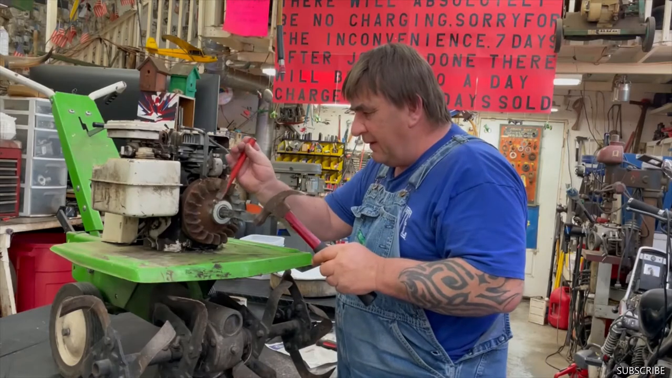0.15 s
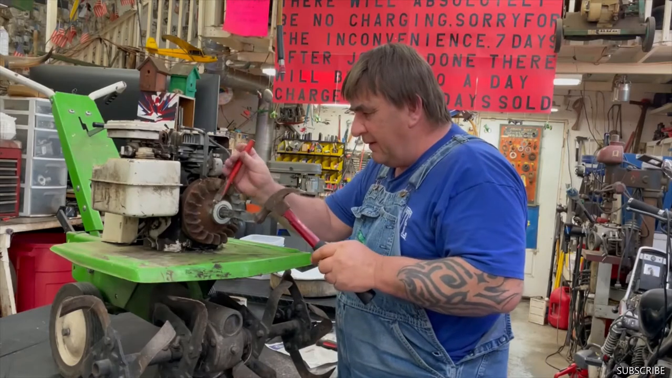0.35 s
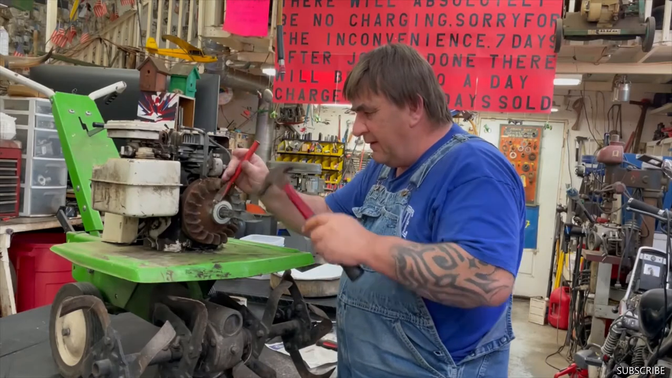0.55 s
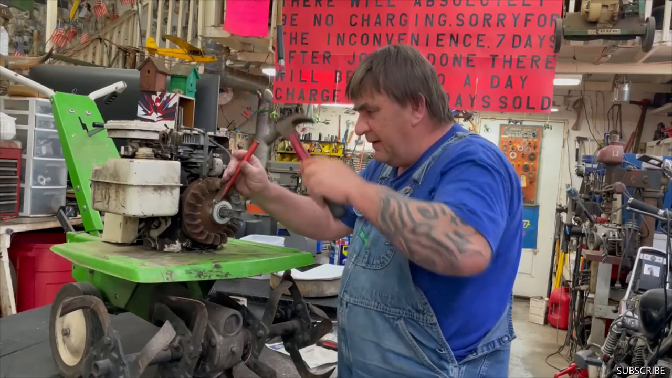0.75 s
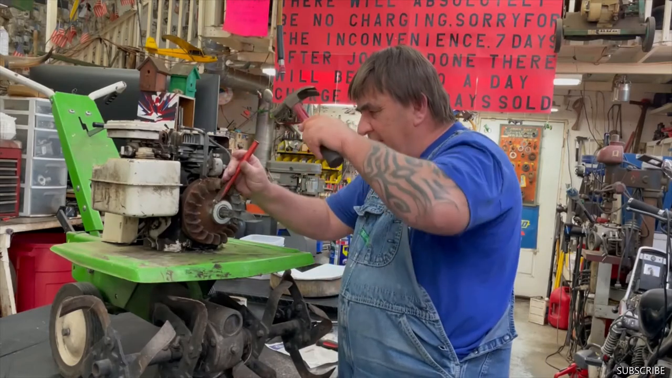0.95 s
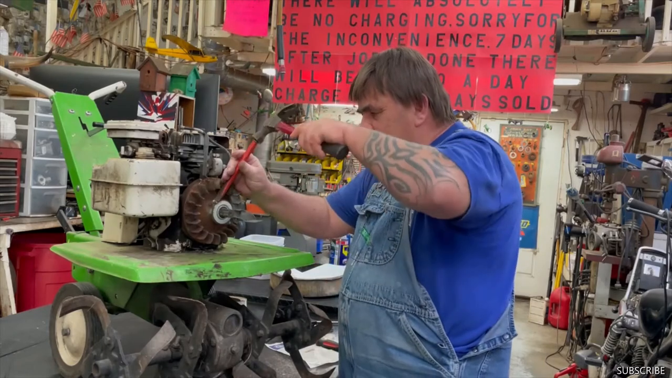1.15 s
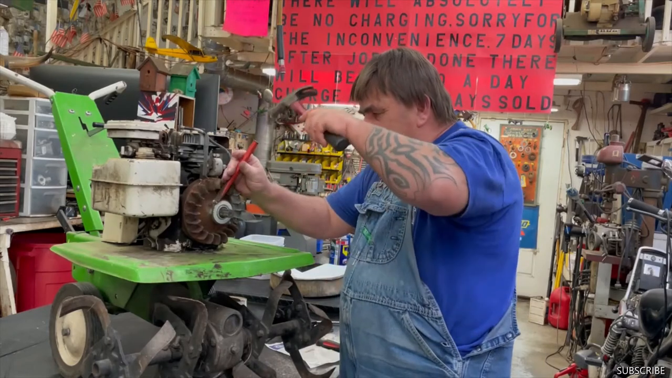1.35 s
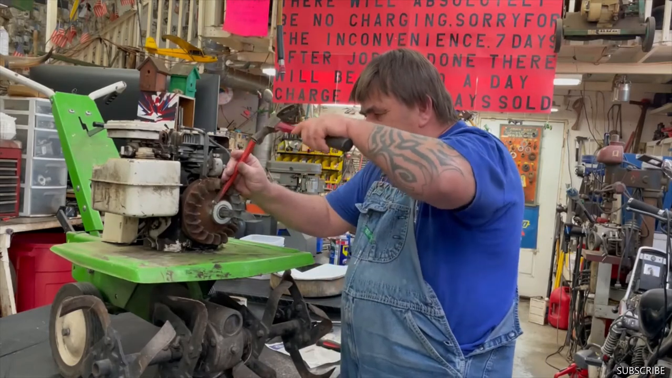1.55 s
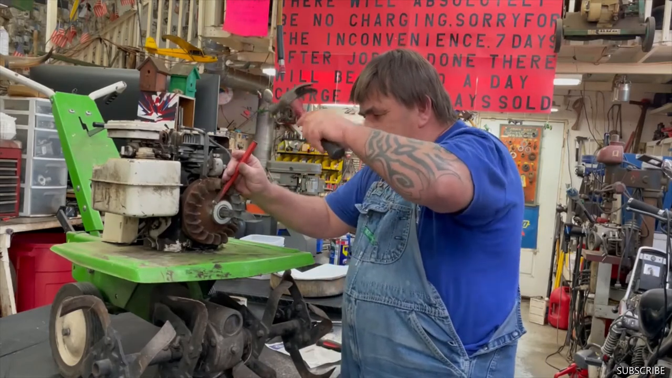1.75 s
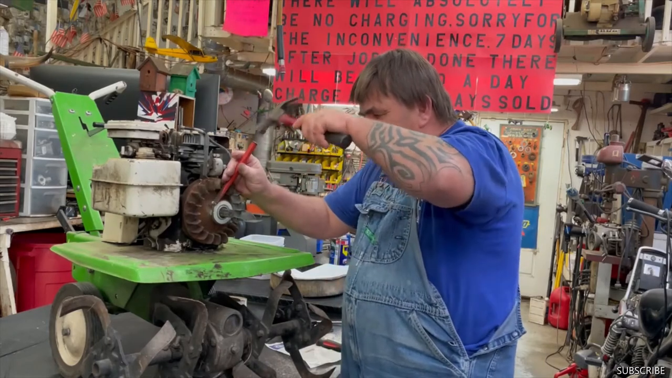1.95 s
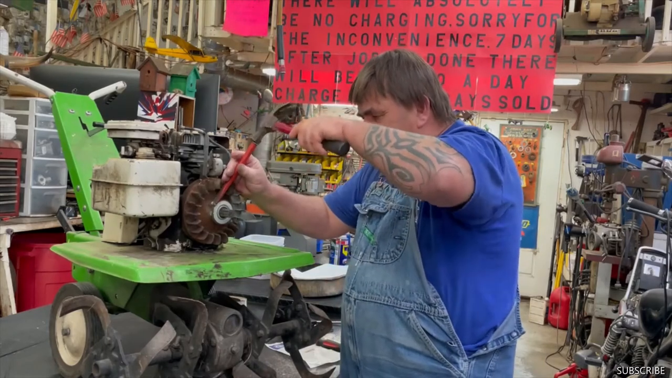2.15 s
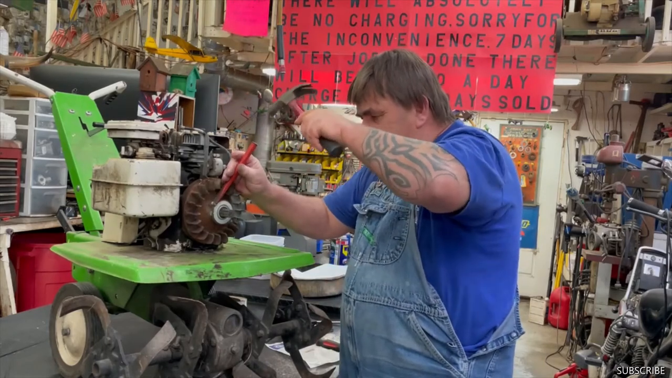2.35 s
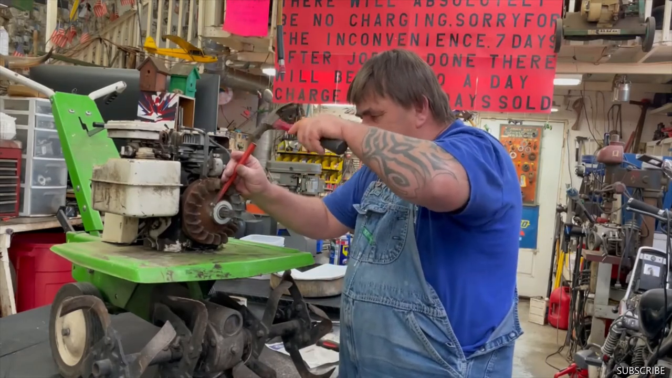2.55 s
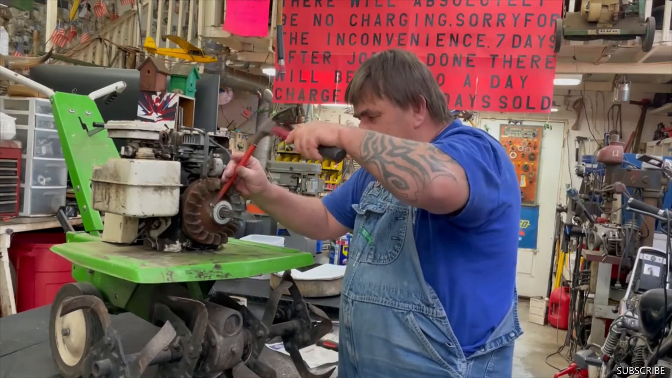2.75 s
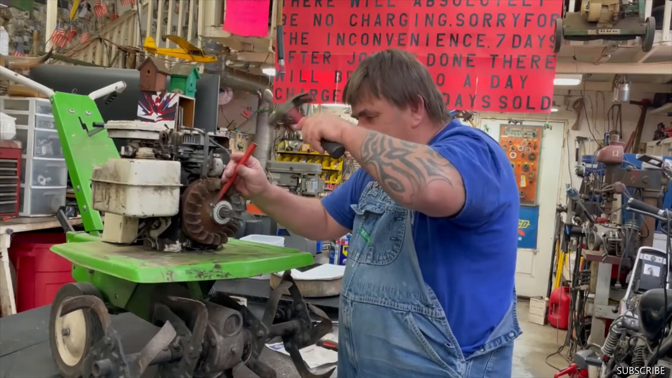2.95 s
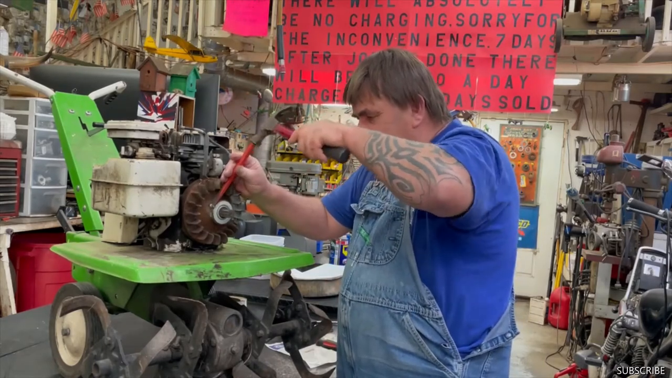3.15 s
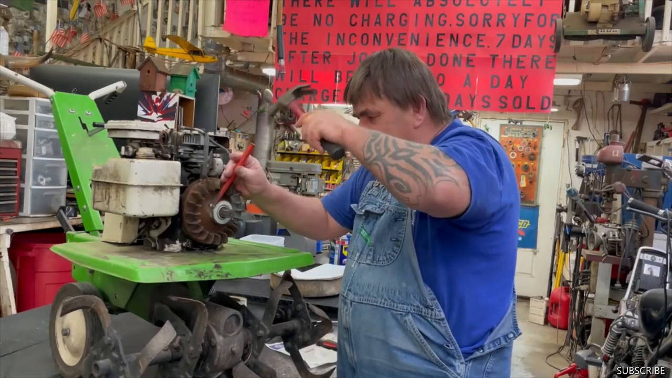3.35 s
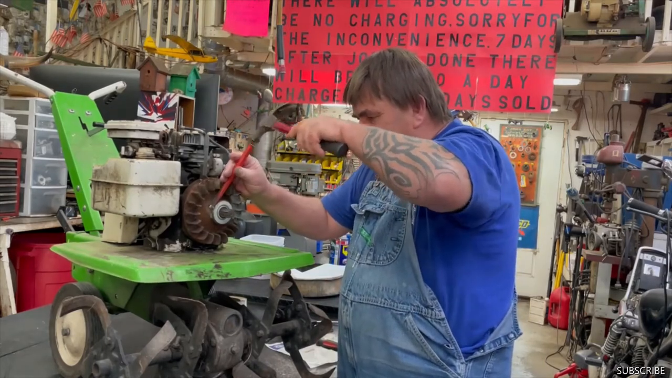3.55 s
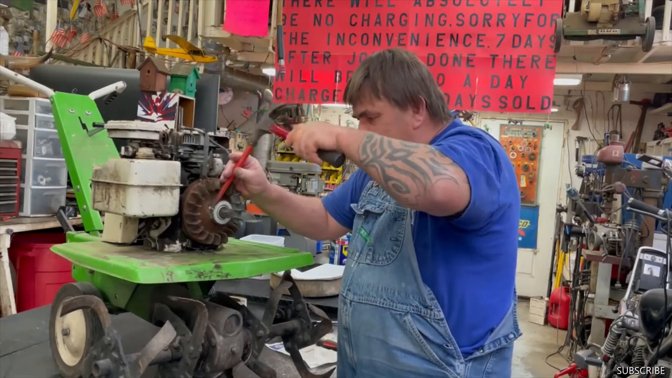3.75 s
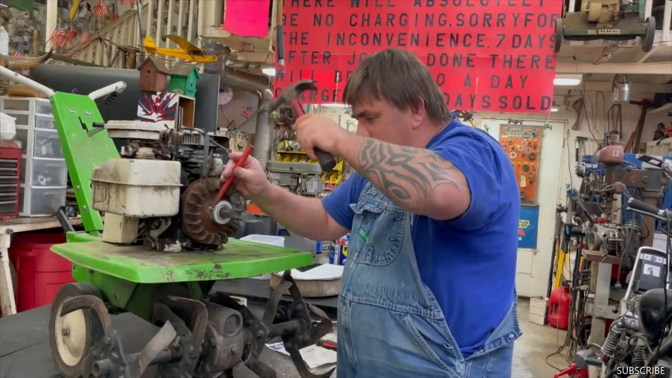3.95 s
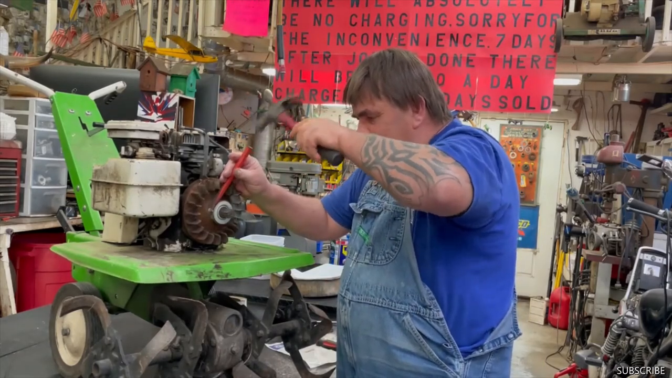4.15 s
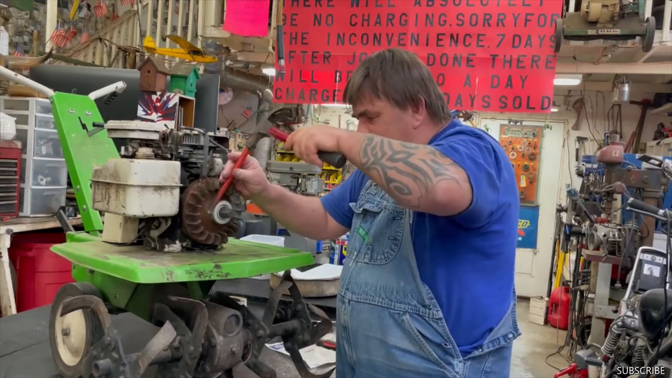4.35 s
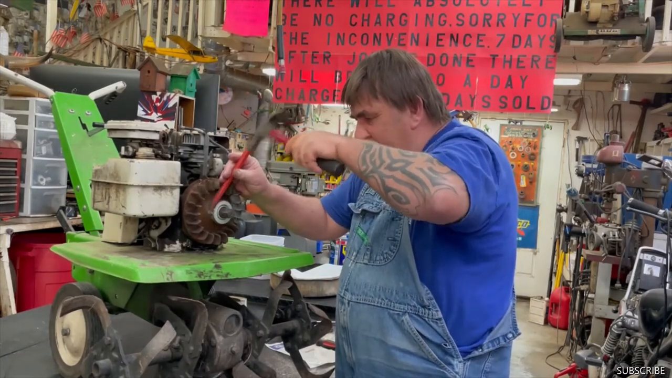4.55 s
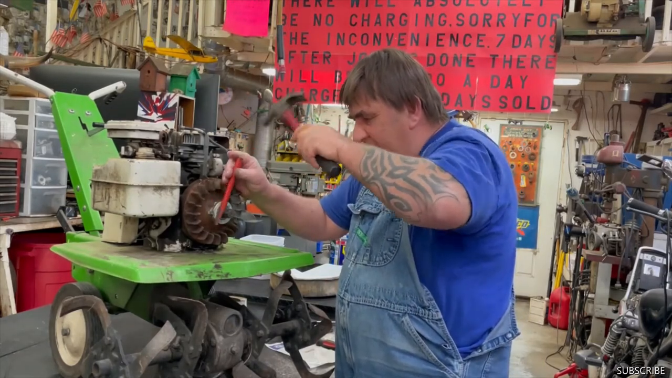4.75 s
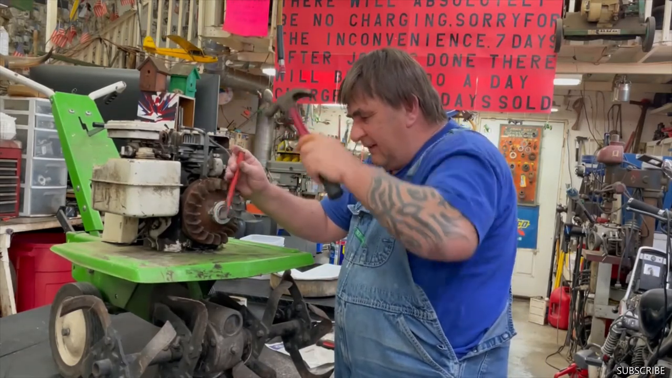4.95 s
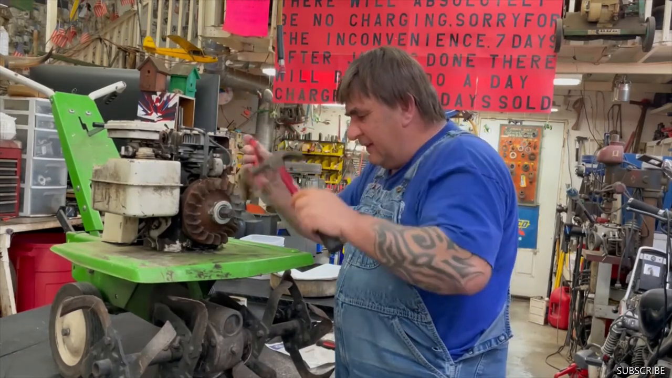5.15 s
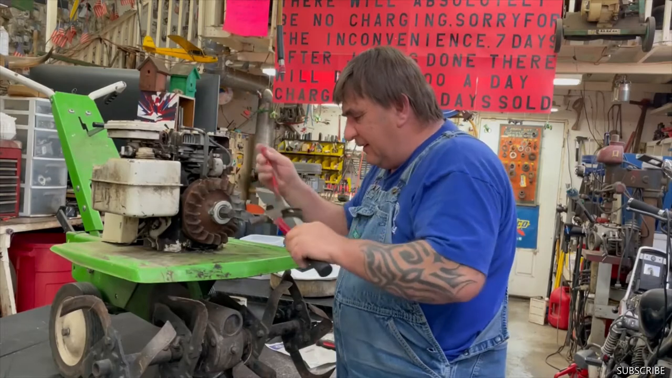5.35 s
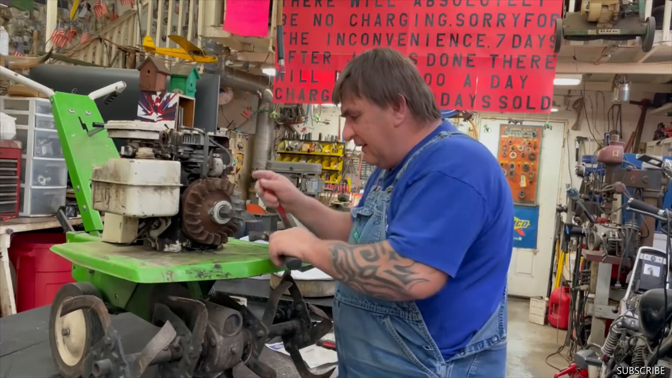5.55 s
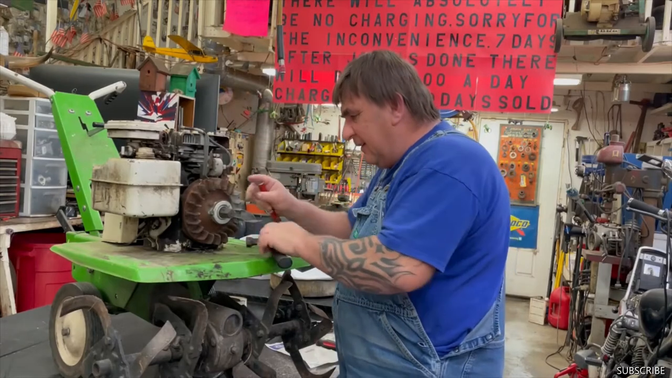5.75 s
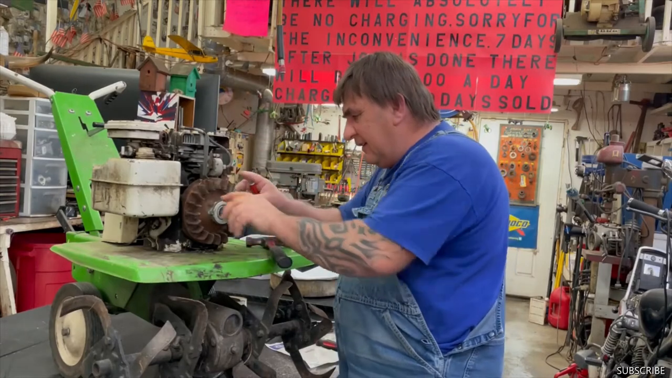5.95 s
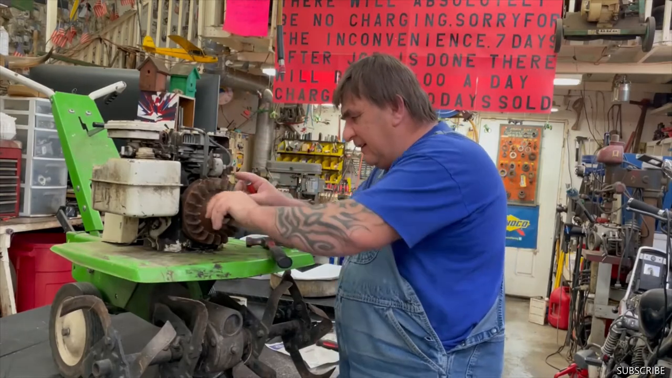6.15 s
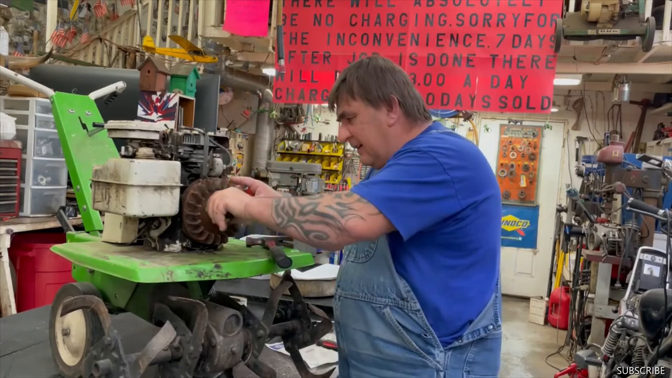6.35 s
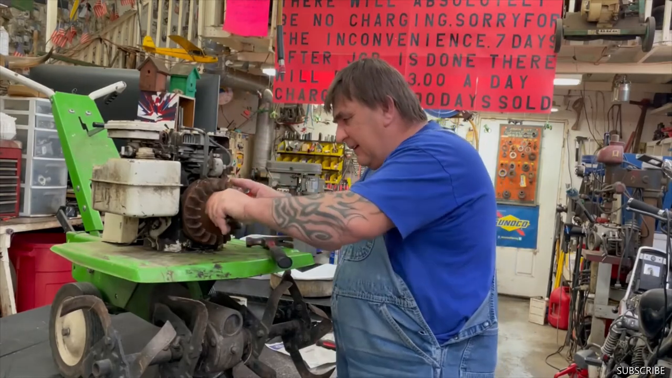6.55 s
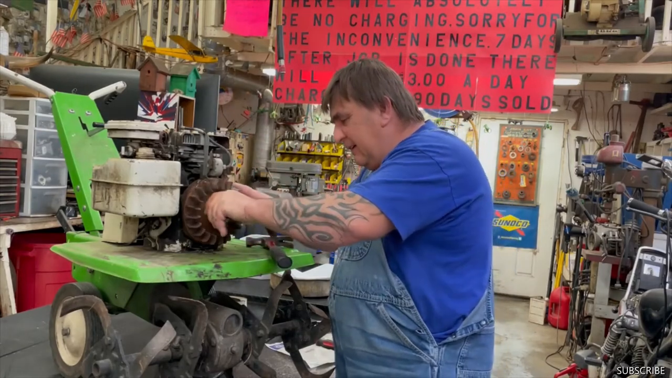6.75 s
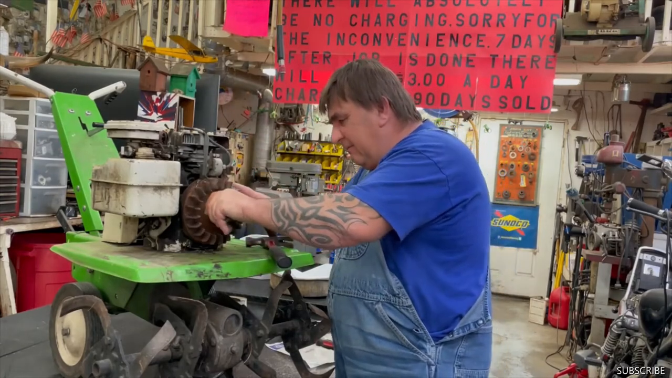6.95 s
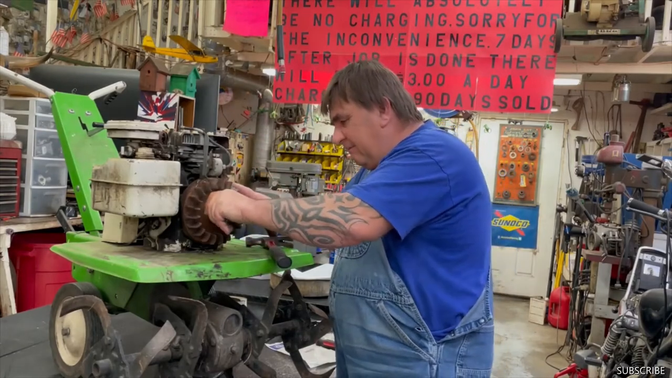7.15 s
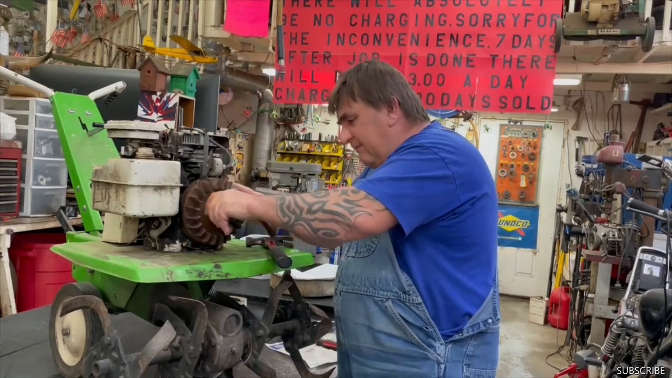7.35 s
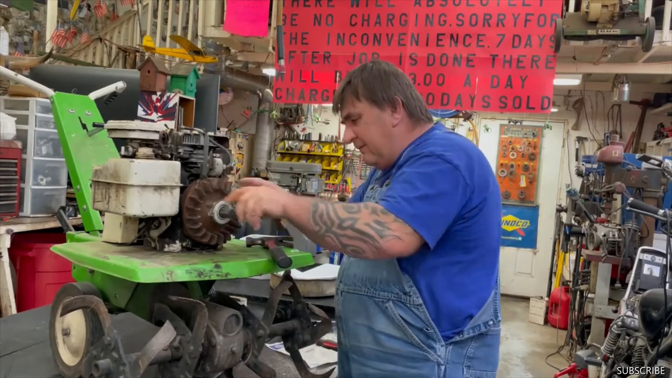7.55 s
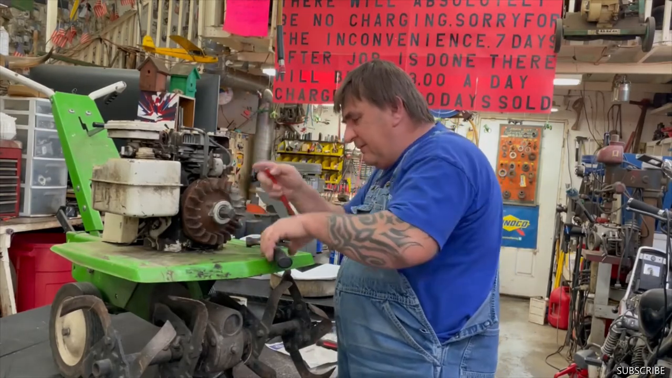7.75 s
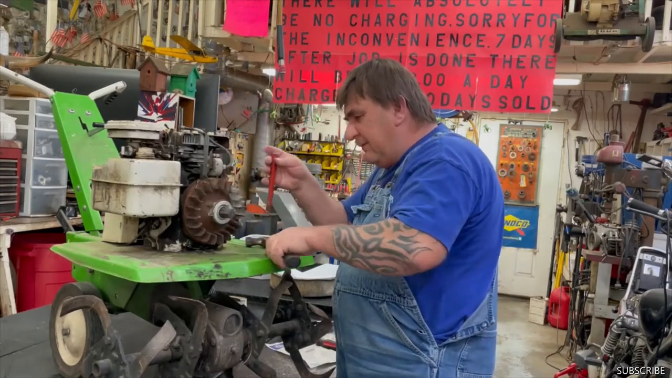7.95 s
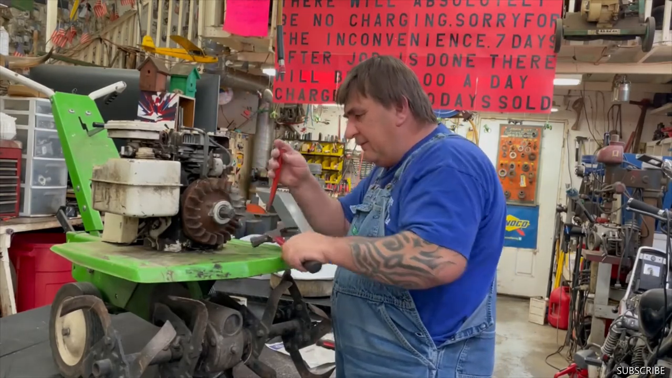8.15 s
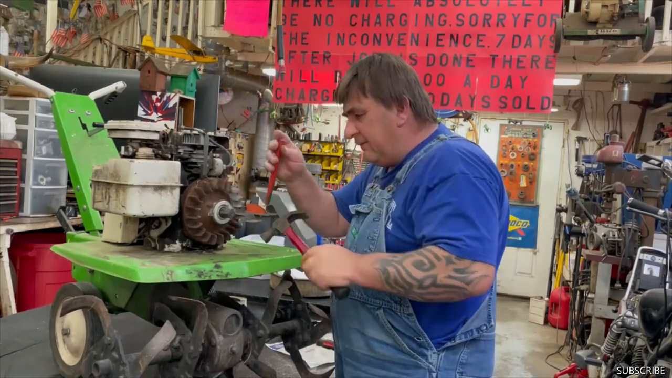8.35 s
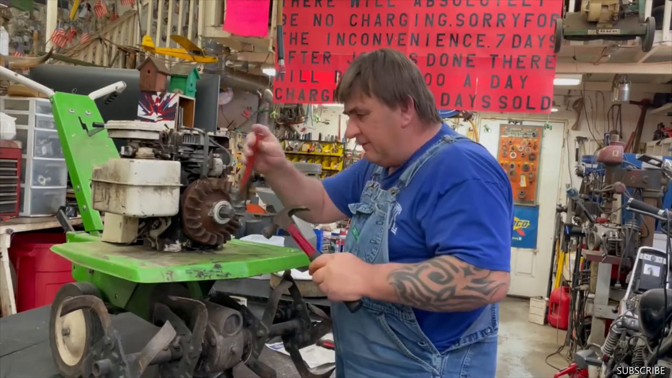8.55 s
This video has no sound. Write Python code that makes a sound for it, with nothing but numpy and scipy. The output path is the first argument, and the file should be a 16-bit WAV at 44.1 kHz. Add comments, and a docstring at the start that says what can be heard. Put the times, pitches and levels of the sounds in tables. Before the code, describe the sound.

A hammer cracks on a chisel a dozen times at a small engine, ringing steel and booming table, then tools clatter down in a cluttered workshop.

```python
"""A hammer drives a chisel against a small engine on a steel table, two metres from a phone in a cluttered workshop.
Each blow is a crack of shaped noise, steel ringing in decaying sines and a late boom of the table in band noise.
Tools later bounce on the table as bursts with ringing modes, small steel clinks come before and after the blows,
and a sleeve rustles in strokes of noise; the hum of a fan and microphone hiss, both filtered noise, lie under it.
Echoes from the clutter surround the bench, which stands left of the phone's two microphone ports."""
import sys
import numpy as np
from scipy import signal
from scipy.fft import rfft, irfft, next_fast_len
from scipy.io import wavfile
from scipy.ndimage import uniform_filter1d

SR = 44100
rng = np.random.default_rng(int(sys.argv[2]) if len(sys.argv) > 2 else 0)


def digitize_waveform(pressure):
    """Quantize a signal to 16-bit integers and store it at the path in sys.argv[1].

    Rows of a 2-D input are taken as channels; values are limited to [-1, 1].
    """
    field = np.atleast_2d(pressure).T
    bounded = np.clip(field, -1, 1)
    quanta = np.round(bounded * 32767).astype(np.int16)
    wavfile.write(sys.argv[1], SR, quanta)


N = 379260
T = np.arange(SR) / SR  # one second after a hit


def undb(db):
    """Turns decibels into an amplitude factor."""
    return 10 ** (np.asarray(db) / 20)


def on(table, hz, column=1):
    """Reads a table along log frequency."""
    t = np.array(table, float)
    return np.interp(np.log(hz + 1e-9), np.log(t[:, 0]), t[:, column])


def shape(x, gain):
    """Filters by a gain given as a function of frequency."""
    n = next_fast_len(x.shape[-1])
    hz = np.arange(n // 2 + 1) * SR / n
    return irfft(rfft(x, n) * gain(hz), n)[..., :x.shape[-1]]


def level(x, db):
    """Sets the rms level in dB."""
    return x * undb(db) / np.sqrt(np.mean(x ** 2))


def peak(hz, centre_hz, width_hz):
    """Gain of a resonance around its centre."""
    return 1 / np.sqrt(1 + (2 * (hz - centre_hz) / width_hz) ** 2)


def walk(rate):
    """Random levels held 1 / rate s and slewed twice; spread near 1."""
    k = int(SR / rate)
    steps = np.repeat(rng.standard_normal(N // k + 1), k)
    return 1.6 * uniform_filter1d(uniform_filter1d(steps, k), k)[:N]


def add(track, s, x):
    """Lays a one-second sound into the track at s seconds."""
    i = int(s * SR)
    track[i:i + SR] += x[:N - i]


def spread(a, b):
    """Two unrelated sounds made into a left and right that are alike by band."""
    # likeness of the sound sent to the two ports: hz, likeness (0-1)
    alike = [(40, .85), (90, .95), (200, 1), (400, 0.65), (1200, 0.1), (3000, 0.9), (5500, 0), (8000, 0.22),
             (13000, 0.99)]
    likeness = lambda f: np.clip(on(alike, f), 0, 1)
    mid = shape(a, lambda f: np.sqrt((1 + likeness(f)) / 2))
    side = shape(b, lambda f: np.sqrt((1 - likeness(f)) / 2))
    return np.array([mid + side, mid - side])


def ring(modes, lift_db=0):
    """Decaying sines; each hit shares its force out differently; pitch and strength vary a little by chance."""
    scatter_db, flutter_db = 2, 2.5  # chance in a mode's strength from hit to hit, and while it rings
    hz, db, t60 = np.transpose(modes)[:, :, None]
    size, phase, tune = rng.standard_normal((3, len(modes), 1))
    flutter = signal.resample(rng.standard_normal((len(modes), 150)), SR, axis=1)
    strength_db = db + lift_db + scatter_db * size + flutter_db * flutter
    decay = undb(strength_db - 60 * T / t60)
    return np.sum(decay * np.sin(2 * np.pi * hz * (1 + .002 * tune) * T + 2 * phase), axis=0)


def burst(colour, hold_s, tilt_db, knee_hz):
    """Chatter of steel in contact: noise lasting about twice hold_s; tilt lifts all above the knee."""
    x = rfft(rng.standard_normal(SR) * np.exp(-((T - hold_s) / hold_s) ** 4))
    f = np.arange(len(x))  # one bin per Hz
    colour_db = on(colour, f) + tilt_db / (1 + (knee_hz / (f + 1)) ** 2)
    # the noise spectrum is only partly evened out, so each hit keeps some grain
    x = irfft(x / np.abs(x) ** 0.49 * undb(colour_db), SR)
    x = x * np.clip(T / 0.00083, 0, 1) * (T < .05)
    return x / np.sqrt(np.sum(x ** 2) / (2 * hold_s * SR))


def shop():
    """Fan and distant rumble: a wavering floor of noise with a few resonances."""
    # colour of the workshop floor: hz, density_db (per Hz)
    floor_colour = [(15, -60.5), (25, -27.5), (43, -15.5), (120, -2.5), (223, -27), (293, -5.5), (384, -24),
                    (463, -16), (575, -32.5), (659, -18), (714, -28.5), (796, -22), (1130, -32),
                    (1890, -35.5), (16000, -77)]
    # fan resonances: centre_hz, width_hz, level_db (rms)
    fan = [(135, 98, -59), (320, 90, -68), (456, 19, -71.5), (656, 6.8, -75), (811, 15, -69),
           (846, 7.1, -71)]

    def one():
        floor = level(shape(rng.standard_normal(N), lambda f: undb(on(floor_colour, f))), -55.5)
        hum = sum(level(shape(rng.standard_normal(N), lambda f: peak(f, hz, w) ** 2), db) for hz, w, db in fan)
        return floor * undb(1.0 * walk(3)) + hum
    return spread(one(), one())


def microphone_hiss():
    """Electrical noise of the microphones, unrelated at the two ports."""
    # hiss colour: hz, density_db (per Hz)
    hiss_colour = [(4000, -34), (8000, -5.5), (13000, 1.5), (16000, -12.5)]
    return level(shape(rng.standard_normal((2, N)), lambda f: undb(on(hiss_colour, f))), -93)


def rustle():
    """Cloth and hands rub: a low drag on the table, a soft middle hiss and a grainy top; strokes rise, hold, fade."""
    # strokes: start_s, rise_s, hold_s, low_drag_db, middle_db, top_octave_db
    strokes = [(.22, 0.086, 0.076, -73, -98, -82), (6.05, .1, .15, -73.5, -88, -87.5),
               (6.42, .03, 0.19, -72, -81, -83), (7.215, .1, 0.71, -71, -74, -81),
               (7.77, 0.057, 0.028, -72, -69.5, -67.5), (7.862, 0.13, 0.012, -48, -60.5, -69)]
    rise_db, fade_db_per_s = 25, 88.5
    bands = [(326, 810, 2.4), (3720, 5400, 1.5), (12320, 4800, 1.6)]  # centre_hz, width_hz, grain_db
    out, t = 0, np.arange(N) / SR
    s, rise_s, hold_s, *levels = np.transpose(strokes)[:, :, None]
    rising_db = rise_db * np.minimum((t - s) / rise_s - 1, 0)
    fading_db = fade_db_per_s * np.maximum(t - s - rise_s - hold_s, 0)
    stroke_db = rising_db - fading_db
    for db, (hz, width_hz, grain_db) in zip(levels, bands):
        hiss = shape(rng.standard_normal(N), lambda f: peak(f, hz, width_hz) ** 2 * f / (f + 200))
        # the strongest stroke at each moment is the one heard
        out = out + level(hiss, 0) * undb(np.max(db + stroke_db, axis=0) + grain_db * walk(40))
    return out


def clinks():
    """Light touches of steel on steel: a tick of contact noise and a few ringing modes."""
    # clinks, each ringing for free_s until a hand or the next touch stops it:
    # start_s, level_db, free_s, tick_db, thud_db, mode_2khz_db, mode_5khz_db, other_modes_db
    touches = [(0.0558, -45.5, .087, -1, -3, -3, -24, -12), (0.1434, -48, .03, 1.5, -14, -33, -23, -14),
               (0.175, -37.5, .06, 4.5, -20, -32, -32, -28), (6.6473, -45, .1, -6, 2, -16.5, -19, -32),
               (6.8473, -54.5, .05, -11, 4, -15, -26, -30), (6.9017, -46.5, .13, -2.5, 0, -32, -10, -30)]
    # modes of a clink: hz, level_db, t60_s
    clink_modes = [(520, -4, .1), (690, -2, .08), (2126, 0, .2), (5330, -6, .15), (5260, -12, .1),
                   (3967, -12, .15), (6842, -10, .15)]
    # faint high ticks: start_s, level_db
    faint = [(6.0686, -70), (6.1574, -72), (6.4313, -61), (6.5454, -65), (6.6189, -60), (7.3694, -66),
             (7.746, -63), (7.8106, -65), (7.9167, -59.5), (7.9648, -56), (7.9854, -60)]
    # modes of a faint tick: hz, level_db, t60_s
    tick_modes = [(8600, 3, 0.12), (12900, -25.5, 0.05), (13800, -21, .08)]
    # contact colours: hz, density_db (per Hz)
    dull = [(300, -10), (700, 14.5), (3500, -4.5), (6000, -16), (16000, -27)]
    bright = [(7000, -23), (11000, -9), (13300, -2), (16000, -20)]
    out = np.zeros(N)
    for s, db, free_s, tick_db, *parts_db in touches:
        lift_db = np.repeat(parts_db, [2, 1, 2, 2])[:, None]  # modes per part
        damped = np.exp(-np.clip(T - free_s, 0, 1) / .008)
        tick = undb(tick_db) * burst(dull, 0.002, 0, 4000)
        add(out, s, undb(db) * (tick + damped * ring(clink_modes, lift_db)))
    for s, db in faint:
        tick = undb(-9.0) * burst(bright, 0.0057, 0, 4000)
        add(out, s, undb(db) * (tick + undb(-12) * ring(tick_modes)))
    return out


def drops():
    """Heavy tools bounce on the sheet-steel table: a clatter of contact sounds with its ringing modes."""
    # two tools with their bounces and one light touch, a list for each: start_s, level_db
    landings = [
        [(5.548, -27), (5.564, -23.5), (5.582, -24), (5.597, -24)],
        [(5.686, -30.5), (5.696, -27.5), (5.709, -28.5), (5.724, -25), (5.759, -32.5), (5.887, -49)],
        [(4.934, -47)],
    ]
    # clatter colour: hz, density_db (per Hz)
    clatter = [(88, -42), (150, -7), (231, -4), (498, -0.5), (864, -2), (1210, -10), (2810, -17),
               (5480, -30), (6810, -28), (9890, -32.5), (13300, -36.5), (15600, -48), (16500, -53)]
    # table modes: hz, level_db, t60_s
    table_modes = [(180, -9, .1), (258, 0, .14), (315, -3, .2), (470, -2, .14), (530, -2, .16),
                   (640, -4, .16), (770, -5, .12), (870, -7, .12), (1190, -10, .1), (1600, -12, .1)]
    # a tool lands on its edge with extra treble, which fades as it settles flat
    edge_db, flatten_s = 23.5, 0.027
    table_db, contact_s = -9, 0.0084
    out = np.zeros(N)
    for bounces in landings:
        for s, db in bounces:
            treble_db = edge_db * np.exp(-(s - bounces[0][0]) / flatten_s)
            table_ring = undb(table_db) * np.clip(T / 0.0056, 0, 1) * ring(table_modes)
            add(out, s, undb(db) * (burst(clatter, contact_s, treble_db, 2600) + table_ring))
    return out


def hammer():
    """Crack, engine knock, chisel and hammer ring; the table top swells after the blow and booms on."""
    # blows, one rebound and a last light tap; the last three columns are relative to the blow:
    # start_s, level_db, chisel_ring_db, hammer_head_ring_db, treble_db
    blows = [(1.079, -16.5, -12, -17.5, -3.5), (1.44, -17, -18, -21, -4), (1.773, -16.5, -16.5, -19.5, -4),
             (2.087, -18.5, -13.5, -17, -2), (2.399, -18.5, -12.5, -19.5, -2.5),
             (2.707, -16.5, -13, -21.5, -0.5), (3.116, -16.5, -22, -21.5, 3.5),
             (3.424, -18, -11.5, -17.5, 0), (3.697, -17, -18, -24, 1), (3.984, -18, -15.5, -20.5, -1),
             (4.254, -17.5, -16, -23, 1.5), (4.521, -19, -14.5, -6.5, 2), (4.537, -22.5, -22, -16.5, 3),
             (4.932, -40.5, -45, -14, -12)]
    # crack colour: hz, density_db (per Hz)
    crack = [(180, -41), (300, -18), (923, -1), (1530, -11.5), (3650, -8.5), (4170, -13), (4770, -6),
             (5740, -14), (6780, -9), (9330, -11.5), (12400, -19.5), (14900, -11.5), (16500, -31.5)]
    # modes of the engine, the chisel and the hammer head: hz, level_db, t60_s
    engine_modes = [(700, -2, .025), (815, 3, .03), (900, 0, .02), (1025, 3, .045), (1035, -9, .4),
                    (960, -12, .3), (1460, -8, .08), (1835, -6, .04), (2080, -7, .05), (2290, -5, .04),
                    (2470, -3, .05), (2620, -6, .04), (3085, -5, .04), (3430, -6, .04), (3640, -8, .07)]
    chisel_modes = [(4790, 10, .04), (4775, -7, .28), (4805, 1, .5), (4835, -8, .28), (5190, -9, .2)]
    head_modes = [(5290, -8, .2), (5740, -5, .2), (6130, -4, .12), (6670, -4, .12), (7220, -3, .1),
                  (9540, -3, .12), (10910, -6, .18), (11930, -9, .12), (12580, -6, .08), (13240, -9, .1),
                  (14000, -9, .1), (14870, -2, .12), (15370, -10, .1)]
    # resonances of the table top: centre_hz, width_hz, level_db
    boom_bands = [(75, 12, -6), (95.4, 75, 1), (150, 20, 1.5), (242.5, 30, -3), (284, 123.7, -7),
                  (500, 200, -13.5)]
    knock_db, hard_db = -10, 3  # engine knock relative to a blow, and lift of the upper modes
    boom_start_db, boom_fade_db_per_s = -14.5, 2.5  # relative to each blow; weakens as the work goes on
    out, thud = np.zeros(N), np.zeros(N)
    for s, db, ring_db, head_db, treble_db in blows:
        steel = undb(ring_db) * ring(chisel_modes) + undb(head_db) * ring(head_modes)
        body = burst(crack, 0.0048, treble_db, 6000) + undb(knock_db) * ring(engine_modes)
        # the hard, short contact drives the upper modes more
        body = shape(body, lambda f: undb(hard_db / (1 + (1800 / (f + 1)) ** 2)))
        add(out, s, undb(db) * (body * (T < .9) + steel))
        boom_db = db + boom_start_db - boom_fade_db_per_s * (s - blows[0][0])
        add(thud, s, undb(boom_db) * (1 - np.exp(-T / .015)) * np.exp(-T / 0.18))

    def table_gain(f):
        bands = sum(undb(db) * peak(f, hz, w) ** 2 for hz, w, db in boom_bands)
        return bands / (1 + (55 / (f + 1)) ** 4)
    top = shape(rng.standard_normal((2, N)), table_gain)
    boom = spread(*(thud * level(top, 0)))
    # small steel parts cannot radiate bass
    return shape(out, lambda f: 1 / np.sqrt(1 + (520 / (f + 1)) ** 6)), boom


def room(x, wet_db):
    """Dense echoes from the clutter: half-octave bands of noise, each dying at its own rate."""
    # echoes: hz, t60_s, level_db
    echoes = [(60, 0.3, 3), (250, 0.84, 2.5), (498.5, 0.67, 0.5), (880, 0.61, -2.5), (1410, 0.77, 1.5),
              (3000, 0.49, -1.5), (4800, 0.52, -4.5), (8350, 0.34, 1.5), (15900, 0.25, -4)]
    tail = 0
    for hz in 45 * 2 ** np.arange(0, 9, .5):
        band_gain = lambda f: np.clip(1 - np.abs(2 * np.log2((f + 1) / hz)), 0, 1) ** .5
        band = shape(rng.standard_normal((2, SR)), band_gain)
        tail = tail + band * undb(on(echoes, hz, column=2) - 60 * T / on(echoes, hz))
    tail = spread(*tail) * np.clip(T / 0.0021, 0, 1) * (T < .9) * undb(wet_db)
    return signal.fftconvolve(x[None], tail, axes=1)[:, :N]


def scene():
    """The bench heard direct and through its echoes, with the boom, rustle, workshop and hiss around it."""
    # the bench stands left of the phone: hz, left_minus_right_db
    near = [(300, 3), (1500, 6.5), (4500, 4), (6500, 2.5)]
    blows, boom = hammer()
    bench = blows + drops() + clinks()
    direct = np.array([shape(bench, lambda f: undb(side * on(near, f) / 2)) for side in (1, -1)])
    hiss = microphone_hiss()
    return direct + room(bench, -33.0) + boom + spread(rustle(), rustle()) + shop() + hiss


def record(dry):
    """Two ports in a phone body that differ in level and phase by band; peaks rounded, top cut."""
    # the two microphone ports: hz, left_minus_right_db, left_leads_rad
    ports = [(60, 1, 0), (345, 1.3, .3), (1400, 2, 1.1), (3400, 3.5, 1.1), (4800, 2.5, .9), (6500, .5, -.9),
             (7600, .5, -2.4), (8600, -.5, -3.3), (11700, -.3, -5), (13500, 0, -6.25), (16000, 0, -6.5)]
    top_hz = 16000
    # each port takes half of the difference
    port = lambda f: undb(on(ports, f) / 2) * np.exp(.5j * on(ports, f, column=2))
    both = np.array([shape(dry[0], port), shape(dry[1], lambda f: 1 / port(f))])
    top_cut = signal.ellip(10, .2, 90, top_hz, fs=SR, output="sos")
    return signal.sosfilt(top_cut, np.tanh(both))


dry = scene()
out = record(dry)
digitize_waveform(out)
```